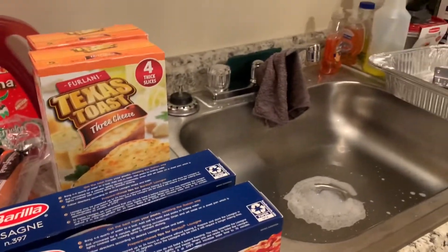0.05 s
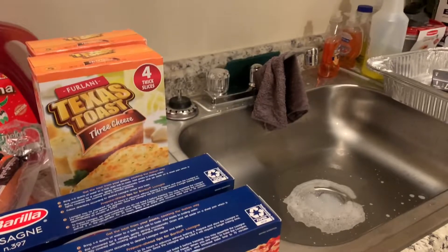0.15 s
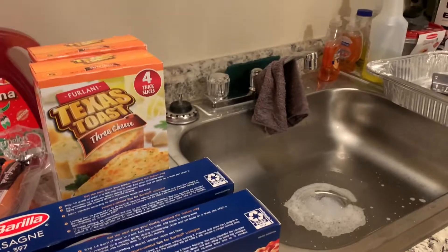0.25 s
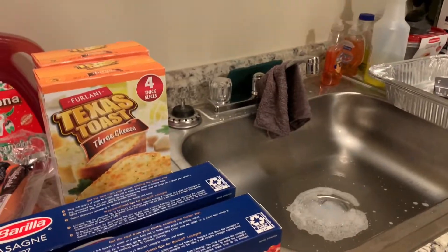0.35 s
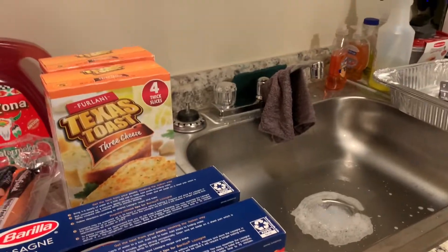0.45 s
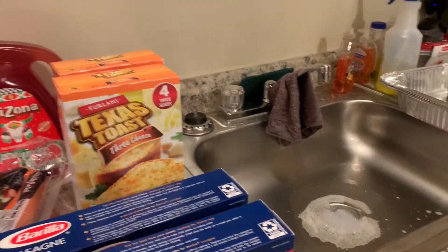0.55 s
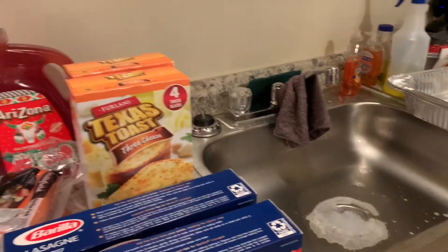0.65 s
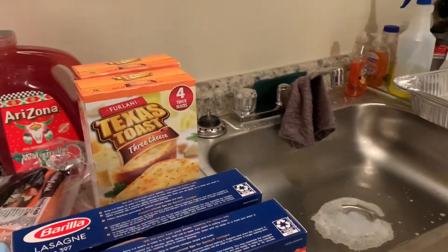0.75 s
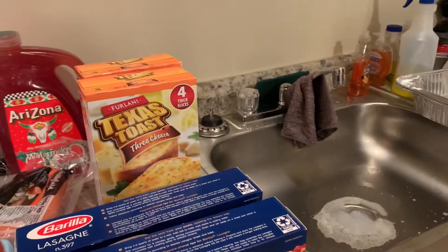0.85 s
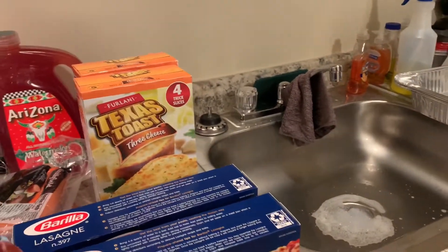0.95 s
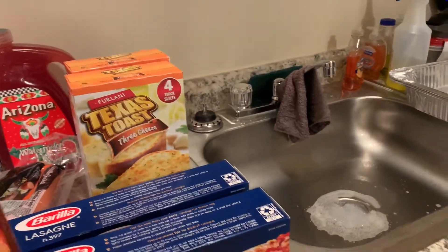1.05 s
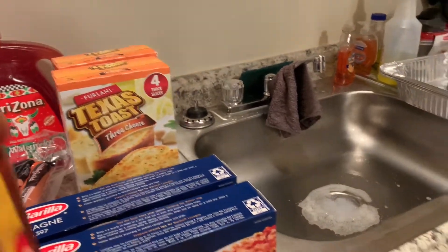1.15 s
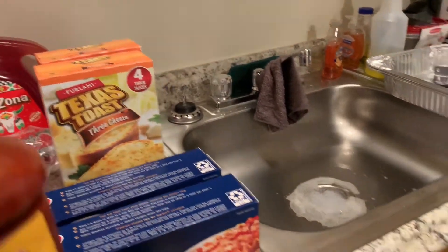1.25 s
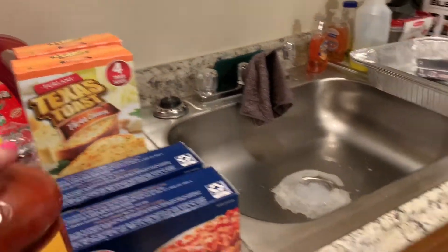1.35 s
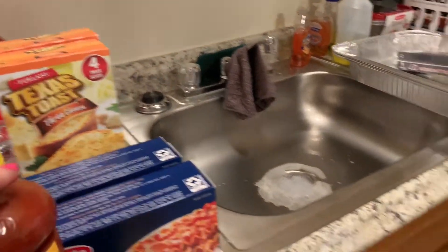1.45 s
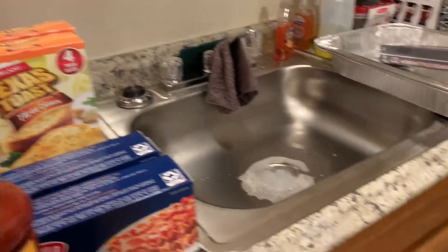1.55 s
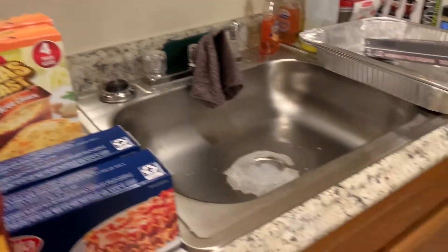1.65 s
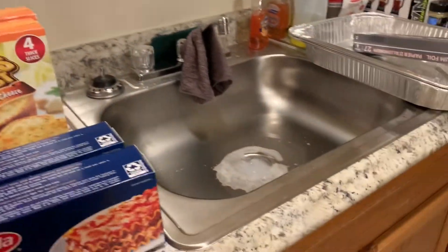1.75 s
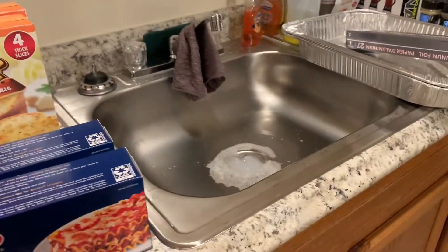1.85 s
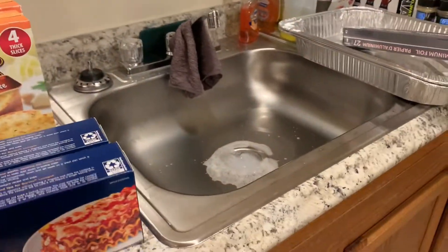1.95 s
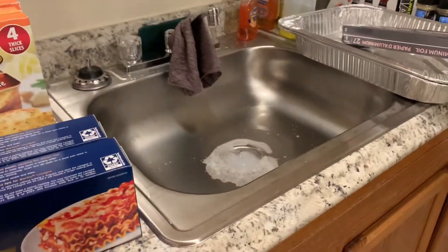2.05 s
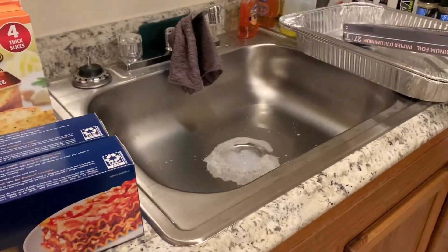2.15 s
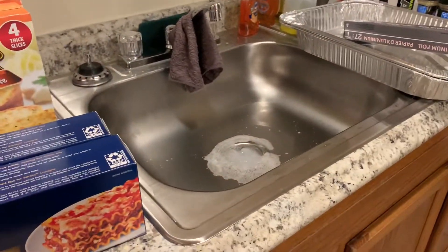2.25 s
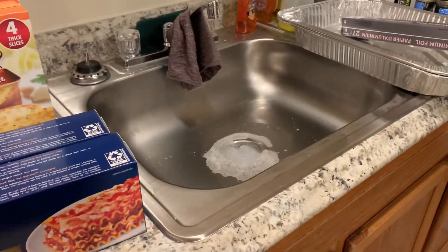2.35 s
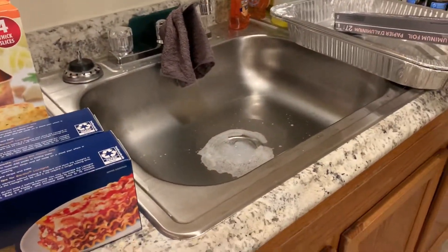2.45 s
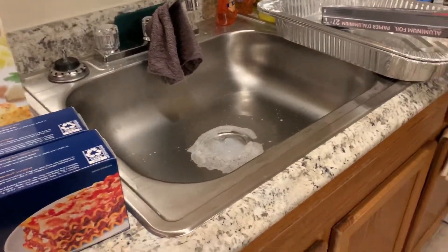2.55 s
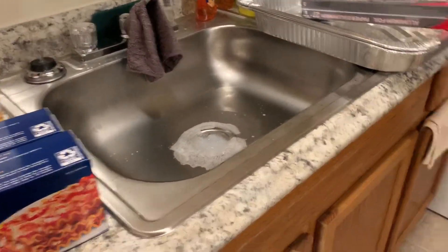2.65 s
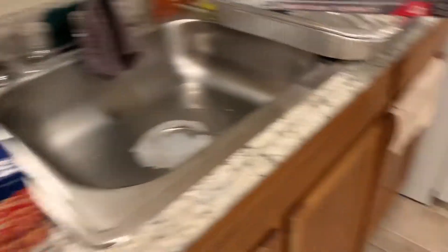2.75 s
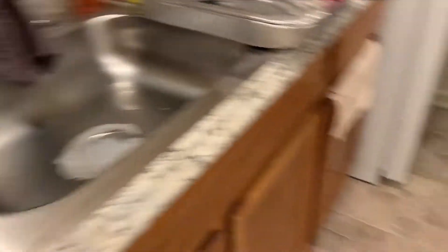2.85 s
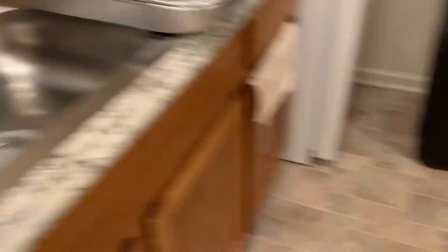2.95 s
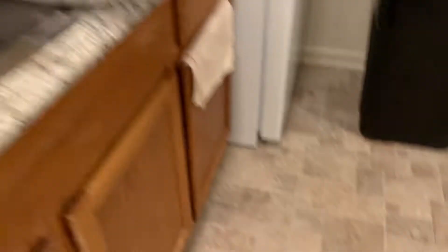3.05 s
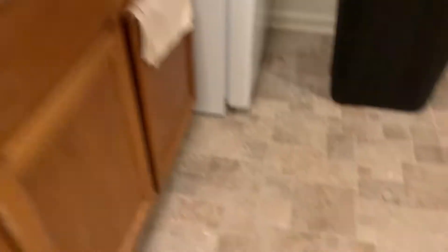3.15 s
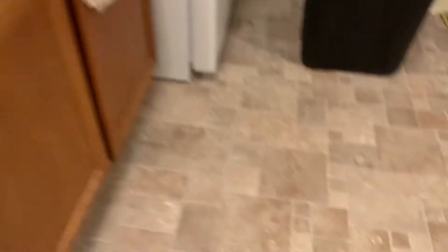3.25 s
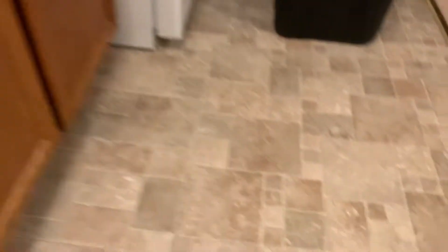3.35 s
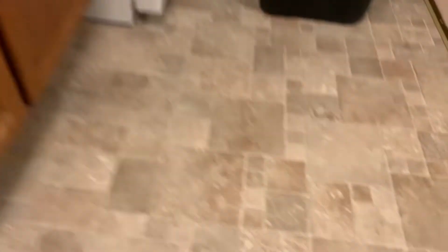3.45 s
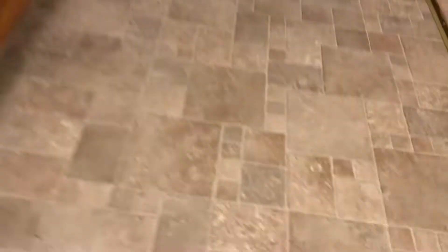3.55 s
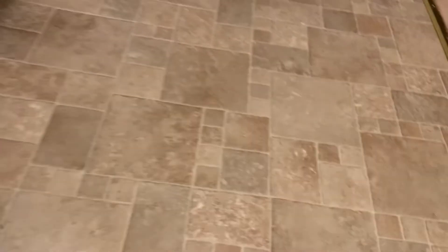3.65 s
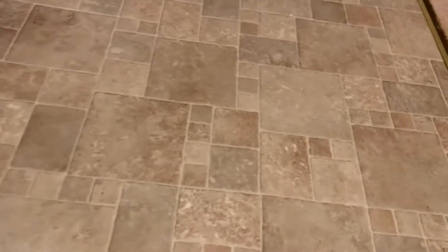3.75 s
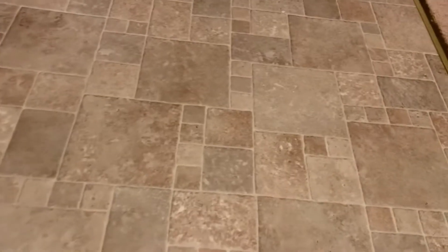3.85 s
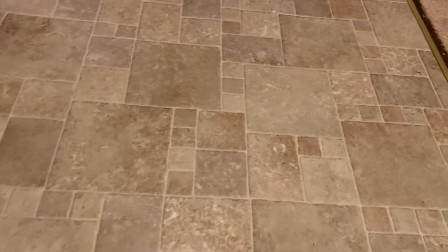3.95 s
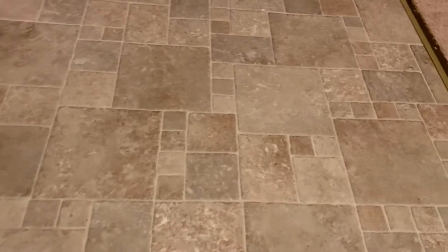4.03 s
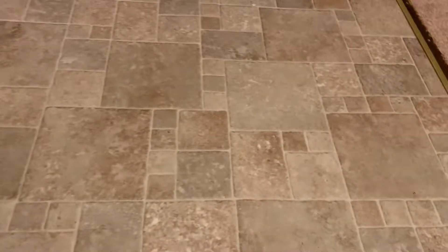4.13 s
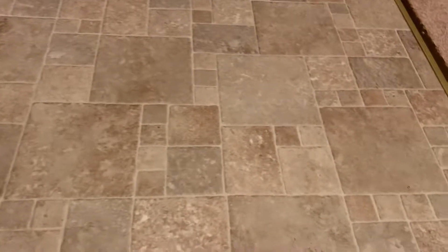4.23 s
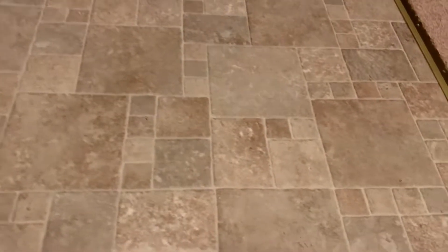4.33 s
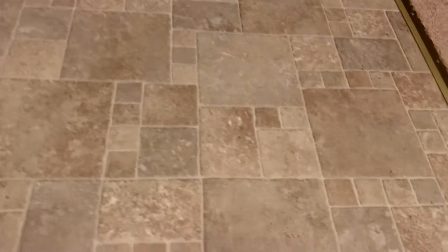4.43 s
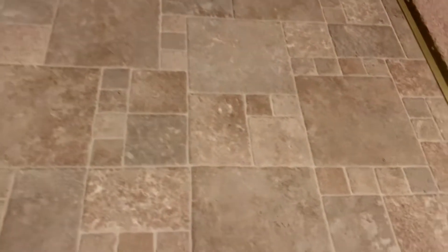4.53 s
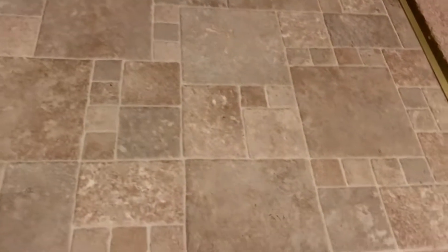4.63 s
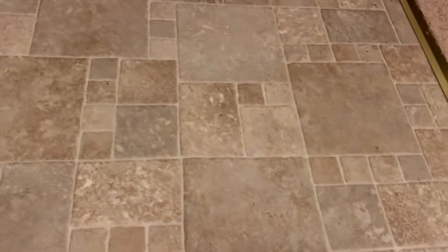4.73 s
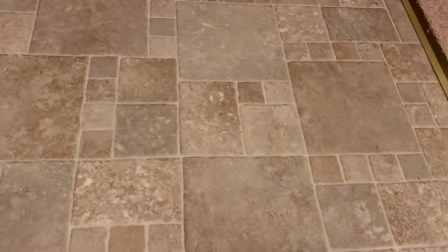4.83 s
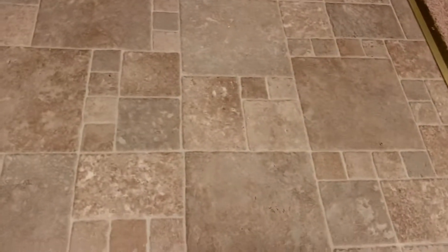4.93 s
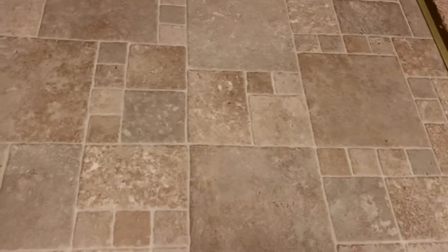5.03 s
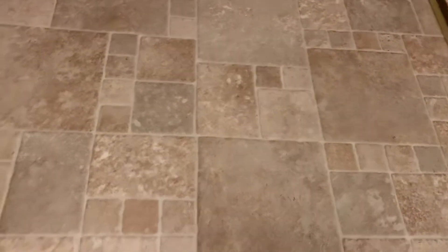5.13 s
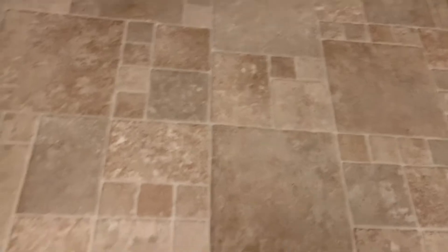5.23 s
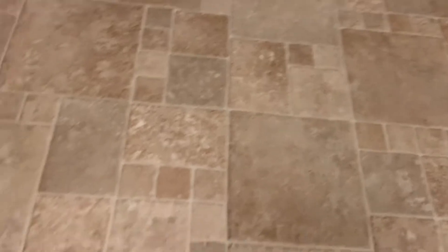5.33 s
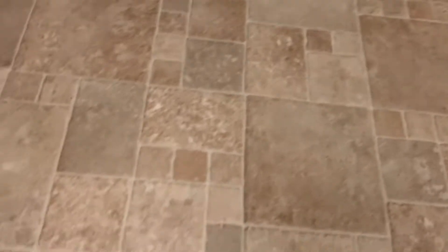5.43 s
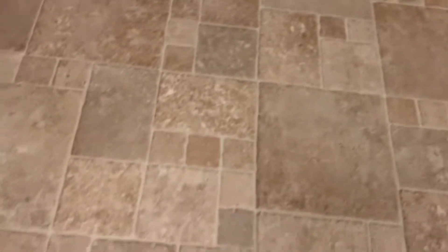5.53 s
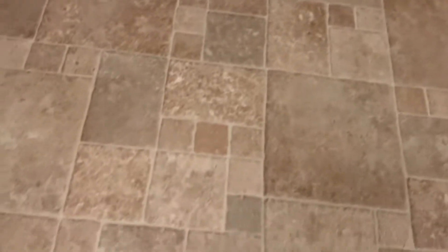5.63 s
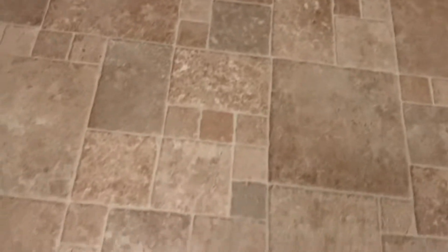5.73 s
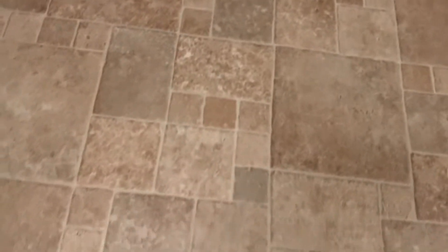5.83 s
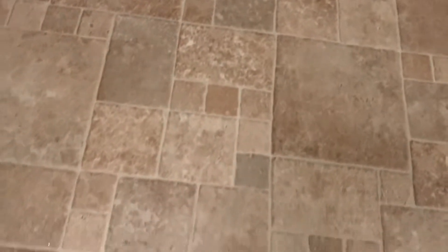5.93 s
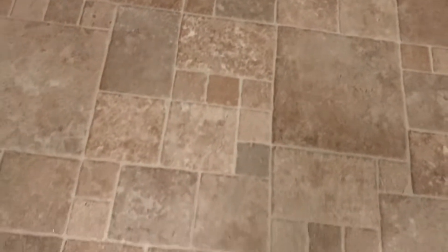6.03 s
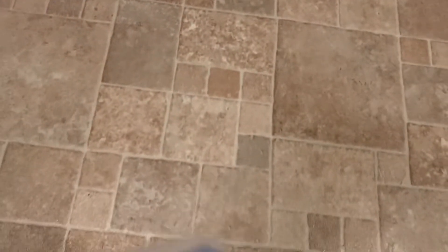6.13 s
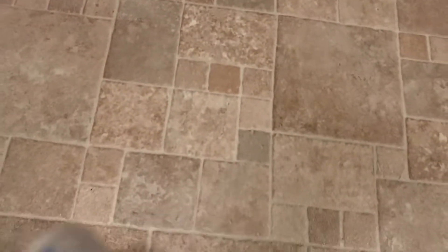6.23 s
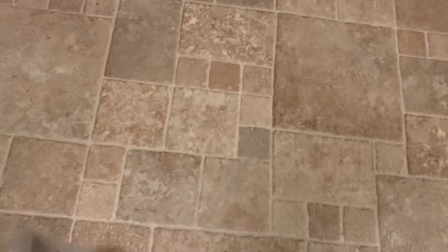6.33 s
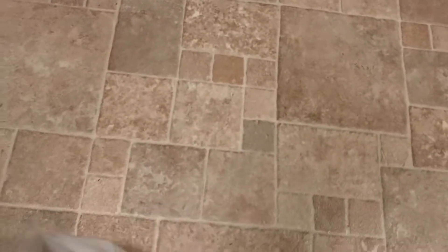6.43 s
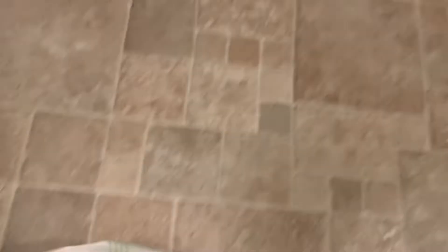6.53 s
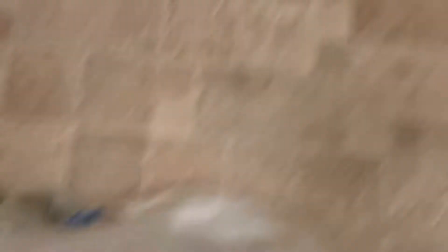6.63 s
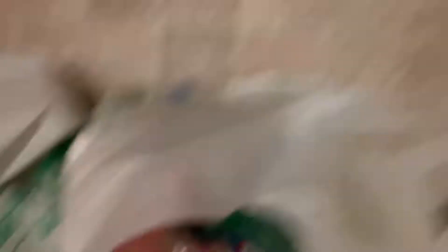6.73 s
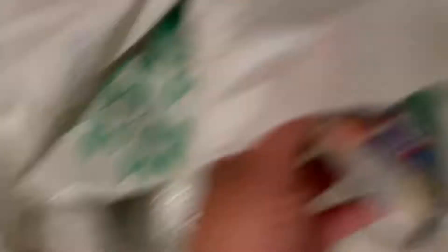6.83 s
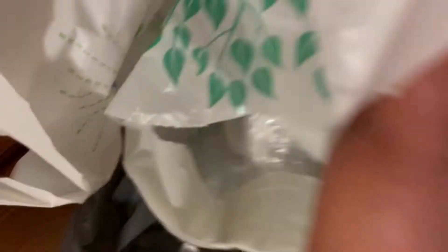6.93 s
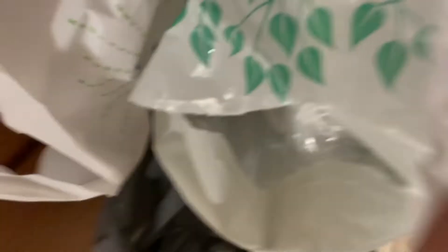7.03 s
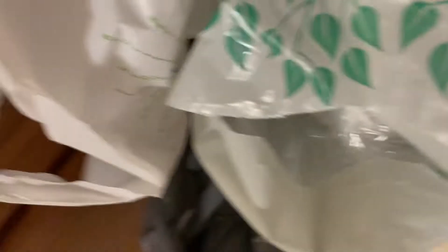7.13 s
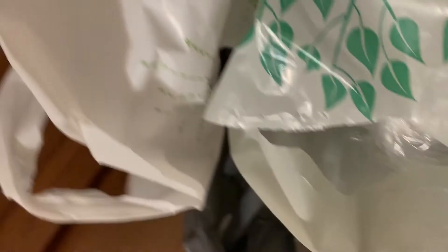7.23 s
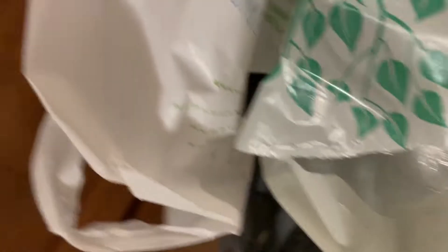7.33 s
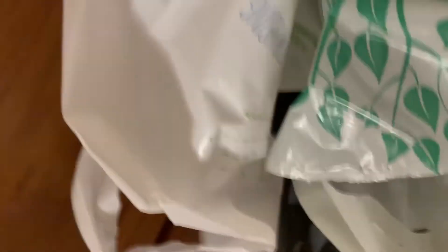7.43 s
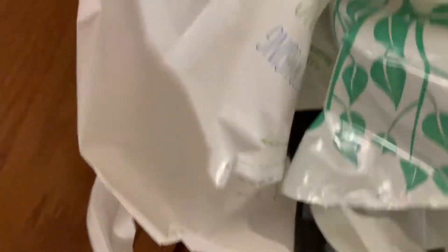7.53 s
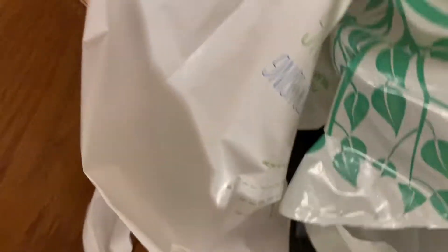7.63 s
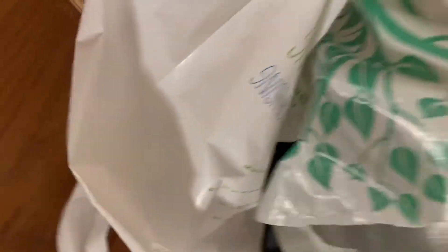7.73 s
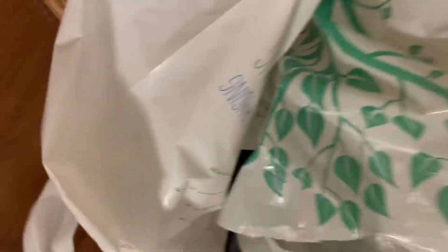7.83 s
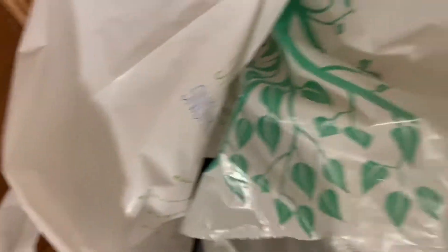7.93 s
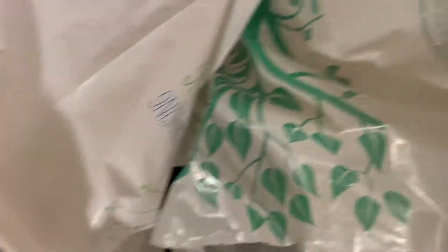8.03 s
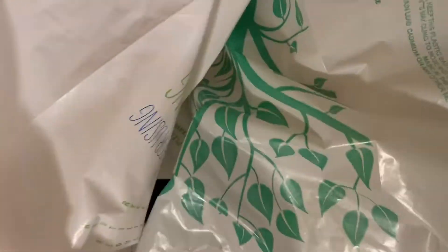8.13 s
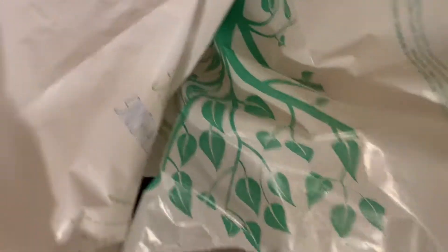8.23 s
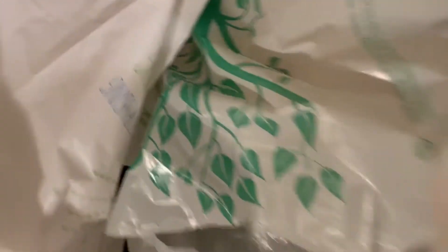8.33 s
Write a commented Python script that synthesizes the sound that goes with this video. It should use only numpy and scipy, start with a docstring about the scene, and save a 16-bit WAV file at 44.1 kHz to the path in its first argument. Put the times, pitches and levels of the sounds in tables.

```python
"""Rummaging in plastic bags

Hands rummage in thin grocery bags in a tiled kitchen, close to a hand-held microphone pair.
First a jar is set on the counter and something heavy thumps, both ringing in damped modes.
The film crackles in swarms of tiny buckles, with louder snaps where a crease flips over.
An appliance hums and its fan blows behind it all."""
import sys
import numpy as np
from scipy import signal
from scipy.fft import rfft, irfft, next_fast_len
from scipy.io import wavfile
from scipy.ndimage import uniform_filter1d

SR = 44100
rng = np.random.default_rng(int(sys.argv[2]) if len(sys.argv) > 2 else 0)


def put_to_file(sound):
    """Save the sound as 16-bit audio at rate SR, in the file named by the first command-line argument."""
    columns = np.atleast_2d(sound).T  # one column per channel
    safe = np.clip(columns, -1, 1)
    whole_steps = np.round(safe * 32767)
    wavfile.write(sys.argv[1], SR, whole_steps.astype(np.int16))


N = 369245

# Spectrum of small creases. Each row: frequency in Hz, relative density in dB.
CREASE_SPECTRUM = [(3000, -5.5), (5000, -4), (8000, 1), (14000, -3.5), (15500, -4.5)]


def amp(db):
    """Amplitude ratio: tenfold for every 20 dB."""
    return 10 ** (np.asarray(db) / 20)


def unit_rms(x):
    """Normalisation to unit mean power."""
    return x / np.sqrt(np.mean(x ** 2) + 1e-20)


def at_frequency(points, hz):
    """Interpolation on a logarithmic frequency axis."""
    f, value = np.transpose(points)
    return np.interp(np.log(hz + 1), np.log(f + 1), value)


def envelope(rows, column=1):
    """Gain at every sample by interpolation in dB, silent before the first row."""
    rows = np.array(rows)
    return amp(np.interp(np.arange(N) / SR, rows[:, 0], rows[:, column], left=-150))


def coloured(x, spectrum):
    """Minimum-phase filtering at unit energy; the spectrum falls away past its ends."""
    hz = abs(np.fft.fftfreq(8192, 1 / SR))
    (low_hz, low_db), (high_hz, high_db) = spectrum[0], spectrum[-1]
    extended = [(low_hz / 4, low_db - 40), *spectrum, (high_hz * 2, high_db - 30)]
    log_gain = np.log(amp(at_frequency(extended, hz)))
    taps = np.fft.ifft(np.exp(np.conj(signal.hilbert(log_gain)))).real[:4096]
    return signal.oaconvolve(x, taps[None] / np.linalg.norm(taps), axes=1)[:, :x.shape[1]]


def resonance(noise, hz, width_hz):
    """Forced response of one resonator, at rms 1."""
    return unit_rms(signal.lfilter(*signal.iirpeak(hz, hz / width_hz, SR), noise))


def wander(per_s):
    """Slow random fluctuation from smoothed noise, at rms 1."""
    span = int(SR / per_s)
    return unit_rms(uniform_filter1d(uniform_filter1d(rng.standard_normal(N), span), span))


def add(mix, s, sound):
    """Superposition of a sound starting at s seconds."""
    part = mix[:, round(s * SR):][:, :sound.shape[1]]
    part += sound[:, :part.shape[1]]


def random_colouring(x, depth_db, width_hz, life_s):
    """Spectral modulation: faint pitches come and go at random in the noise."""
    hz, t, spectra = signal.stft(x, SR, nperseg=1024, noverlap=896)
    field = rng.standard_normal((len(t), len(hz)))
    for _ in range(2):
        field = uniform_filter1d(field, int(life_s * SR / 128) + 1, axis=0)
        field = uniform_filter1d(field, int(width_hz / hz[1]) + 1, axis=1)
    spectra = spectra * amp(depth_db * unit_rms(field).T)
    return unit_rms(signal.istft(spectra, SR, nperseg=1024, noverlap=896)[1][:, :N])


def fan(air_noise, drive):
    """Broadband air noise with two noise-driven resonances."""
    # Fan air and self-noise. Each row: frequency in Hz, relative density in dB.
    air_spectrum = [(60, -6.5), (110, -1.5), (300, -4.5), (600, -15), (1400, -22), (2200, -30.5),
                    (3500, -41), (6000, -54), (15800, -45)]
    # The fan's resonant frequencies in Hz.
    centres_hz = [845, 1685]
    # One resonance per frequency. Each row: bandwidth in Hz, base level in dB.
    peaks = [(45, -67), (60, -70.5)]
    # They grow as the microphones turn to the fan. Each row: time in seconds, gain in dB.
    turning = [(.0, -3.5), (.9, -2), (3.3, 3.5)]
    level = amp(-54 + 1.2 * wander(per_s=4))
    air = level * random_colouring(coloured(air_noise, air_spectrum), depth_db=3.5, width_hz=45, life_s=0.1)
    for hz, (width_hz, db) in zip(centres_hz, peaks):
        air += amp(db) * envelope(turning) * resonance(drive, hz, width_hz)
    return air


def hum():
    """The appliance's tone wavers by slow frequency and amplitude modulation."""
    # Course of the hum. Each row: time in seconds, level in dB, frequency in Hz.
    course = [(0, -51.5, 109), (.3, -53, 110), (.47, -62, 107.6), (.7, -49, 106.9), (1.498, -67, 105.9),
              (2.6, -60, 111.3), (3.3, -49, 119.2), (8.37, -47.5, 120)]
    times, _, pitches = np.transpose(course)
    hz = np.interp(np.arange(N) / SR, times, pitches) + 0.8 * wander(per_s=11)
    cycles = np.cumsum(hz) / SR + np.array([[0], [0.35]])
    flutter_db = 1.3 * wander(per_s=34) + 1.1 * wander(per_s=9.3)
    return envelope(course) * amp(flutter_db) * np.sqrt(2) * np.sin(2 * np.pi * cycles)


def handling_rumble(noise):
    """Structure-borne noise of the microphones moving in the hand."""
    # Course of the rumble. Each row: time in seconds, level in dB.
    levels = [(0.0, -60), (0.7, -67), (0.8, -51), (0.98, -44), (1.47, -72), (1.68, -56), (2.05, -87),
              (2.19, -45), (2.49, -58.5), (5.64, -54.5), (6.01, -35.5), (6.11, -50), (6.45, -46.5),
              (7.25, -55.5), (7.32, -45), (8.0, -47), (8.11, -41), (8.37, -44)]
    # Its spectrum. Each row: frequency in Hz, relative density in dB.
    spectrum = [(20, -12), (40, -10.5), (55, -1), (90, -0.5), (200, -30)]
    return envelope(levels) * unit_rms(coloured(noise, spectrum))


def kitchen(x):
    """Reverberation: sparse reflections of random sign, each band decaying at its own rate."""
    # Decay of the tiled room. Each row: frequency in Hz, reverberation time in seconds.
    decay_times = [(100, 0.1), (500, 0.12), (2000, 0.077), (8000, 0.036)]
    taps = np.zeros((2, SR // 2))
    slots = np.arange(130, SR // 2 - 20, 20)
    arrivals = slots + rng.integers(0, 20, (2, len(slots)))
    np.put_along_axis(taps, arrivals, rng.choice([-1., 1.], arrivals.shape), 1)
    hz, t, spectra = signal.stft(taps, SR, nperseg=256)
    decay = amp(-60 * t / at_frequency(decay_times, hz)[:, None])
    tail = signal.istft(spectra * decay, SR, nperseg=256)[1]
    return signal.oaconvolve(x, tail / np.linalg.norm(tail[0]), axes=1)[:, :N]


def burst(rise_s, t60):
    """Envelope of a sudden release: quadratic growth, then exponential decay."""
    t = np.arange(1500) / SR
    return np.clip(t / rise_s, 0, 1) ** 2 * amp(-60 * np.maximum(t - rise_s, 0) / t60)


def transient(peak_db, spectrum, rise_s, t60, crack):
    """Impulsive excitation: one hard crack inside a short ragged run of smaller ones."""
    run = rng.standard_normal((2, 1500)) * amp(5.4 * rng.standard_normal(1500)) * burst(rise_s, t60)
    impulse = crack * (np.arange(1500) == round(rise_s * SR))
    sound = coloured(run + impulse, spectrum)
    return amp(peak_db) * sound / abs(sound).max(1, keepdims=True)


def ring(modes):
    """Free vibration of damped modes with a soft onset, a quarter cycle apart in the two channels."""
    t = np.arange(SR // 2) / SR
    out = np.zeros((2, len(t)))
    for hz, db, t60 in modes:
        cycles = hz * t + 0.11 * rng.random() + np.array([[0], [0.25]])
        onset = 1 - np.exp(-t * hz / 0.87)
        out += onset * amp(db - 60 * t / t60) * np.sin(2 * np.pi * cycles)
    return out / 2


def knocks():
    """Impacts excite modes: the jar rocks down, its lid clinks, then something heavy thumps."""
    # The jar's blows on the counter. Each row: start in seconds, gain in dB.
    blows = [(1.639, -31.5), (1.646, -25.5), (1.652, -26), (1.717, -39.5), (1.766, -43), (1.92, -40.5)]
    # Contact noise of a blow. Each row: frequency in Hz, relative density in dB.
    contact = [(200, -32), (400, 19), (1000, 8), (2000, -19), (4000, -20), (12000, -64)]
    # Three sets of modes. Each row: frequency in Hz, relative level in dB, 60 dB decay time in seconds.
    jar_and_counter = [(103, 1, .8), (320, 14, 0.05), (382, 3, 0.33), (447, 3, 0.3), (600, 8, 0.05),
                       (1000, 6, 0.04)]
    lid = [(2530, 7, 0.017), (2950, 9.5, 0.012)]
    cabinet_and_floor = [(50, -7, 0.6), (107, 1, 0.12), (151, -16, 0.35), (330, -2, 0.06),
                         (1200, -9, 0.015)]
    out = np.zeros((2, N))
    for s, db in blows:
        add(out, s, amp(db) * ring(jar_and_counter))
        add(out, s, transient(db + 10, contact, rise_s=0.00212, t60=0.025, crack=5.6))
    add(out, 1.9835, amp(-26) * ring(lid))
    add(out, 2.161, amp(-11) * ring(cabinet_and_floor))
    return out


def swishes():
    """Friction noise: a sleeve, then taut film, rubs in soft swells of resonant hiss."""
    # Each row: start in seconds, length in seconds, level in dB, centre in Hz, quality factor.
    strokes = [(0.603, 0.53, -78, 3130, 2.6), (2.327, 0.18, -67, 3130, 3), (2.564, 0.14, -61.5, 4300, 1.7),
               (3.076, .17, -61, 3120, 2.3), (5.26, 0.31, -36.5, 1780, 7.5)]
    out = np.zeros((2, N))
    for s, length_s, db, hz, q in strokes:
        noise = rng.standard_normal((2, SR // 2))[:, :int(length_s * SR)]
        hiss = resonance(resonance(noise, hz, hz / q), hz, hz / q)
        add(out, s, amp(db) * np.hanning(hiss.shape[1]) * hiss)
    return out


def swarm(spectrum, per_s, spread_db, rise_s, t60, q, hiss_share, crack_share):
    """Shot noise of buckles over a sliding hiss: some ring at one pitch, some crack across the band."""
    size_db = spread_db * np.minimum(rng.exponential(1, N), 2.5) + 2.6 * wander(per_s=17)
    buckles = amp(size_db) * (rng.random(N) < per_s / SR)
    kind = rng.integers(0, 8, N)

    def excitation(chosen):
        """Noise carrying the summed power of the chosen buckles."""
        power = signal.oaconvolve(buckles ** 2 * chosen, burst(rise_s, t60) ** 2)[:N]
        return np.sqrt(abs(power)) * rng.standard_normal((2, N))

    # Small patches of film ring high, large ones low.
    pitches = np.geomspace(spectrum[1][0], spectrum[-2][0], 6)
    ringing = np.zeros((2, N))
    for k, hz in enumerate(pitches):
        gain = amp(at_frequency(spectrum, hz)) * np.sqrt(hz)
        ringing += gain * resonance(excitation(kind == k), hz, hz / q)
    cracks = unit_rms(coloured(excitation(kind >= len(pitches)), spectrum))
    hiss = unit_rms(coloured(rng.standard_normal((2, N)), spectrum))
    crackle = np.sqrt(1 - crack_share) * unit_rms(ringing) + np.sqrt(crack_share) * cracks
    return np.sqrt(1 - hiss_share) * crackle + np.sqrt(hiss_share) * hiss


def rummaging(layer):
    """Gain of one film layer: steady rustle and squeezes are incoherent, so their powers add."""
    # Rustle of the jar's wrapper, then of the bags.
    # Each row: time in seconds, then levels in dB of creases, folds and swing (layers 0, 1, 2).
    rustle = [(1.631, -71, -81, -53), (1.641, -48, -33.5, -34), (1.747, -64, -48, -43.5),
              (1.998, -53, -53, -43.5), (2.116, -70, -59, -49.5), (2.33, -89, -70, -50),
              (3.007, -77, -69, -67.5), (3.36, -66, -63, -58), (3.8, -55, -51.5, -66),
              (4.06, -41.5, -47, -56.5), (4.53, -46.5, -43.5, -54), (4.95, -43, -41, -52.5),
              (5.4, -40, -38, -46.5), (5.9, -32.5, -31.5, -42), (6.36, -31.5, -31, -42.5),
              (6.97, -41.5, -45, -52.5), (7.3, -34, -40.5, -44), (7.93, -35.5, -39.5, -47.5),
              (8.2, -42, -34, -56), (8.3, -60, -51.5, -58), (8.372, -49, -50, -63)]
    # The hand closes on the film. Each row: start and hold in seconds, then the same three levels.
    squeezes = [(2.146, 0.016, -60, -52, -35.5), (2.476, 0.0091, -63, -57, -61),
                (2.67, 0.0038, -54, -48.5, -56.5), (3.361, 0.072, -38, -46, -54),
                (3.458, 0.27, -37.5, -40.5, -52.5), (3.835, 0.011, -49, -64, -60),
                (3.928, 0.062, -48, -46.5, -71), (4.126, 0.11, -37, -39, -47),
                (4.266, 0.041, -35, -37.5, -50), (4.402, 0.028, -43, -33.5, -41.5),
                (4.548, 0.14, -32, -33.5, -43.5), (4.726, 0.15, -33.5, -31, -48.5),
                (4.993, 0.01, -37, -30.5, -53), (5.086, 0.1, -38.5, -34, -49),
                (5.435, 0.13, -30.5, -30.5, -42.5), (5.757, 0.13, -27, -31, -48),
                (5.937, 0.017, -26, -23.5, -36.5), (6.064, 0.17, -29.5, -38.5, -38.5),
                (6.389, 0.1, -31.5, -30, -37), (6.63, 0.046, -34.5, -35, -44.5),
                (6.835, 0.0036, -34.5, -36, -42), (6.988, 0.0052, -26.5, -41, -62),
                (7.05, 0.0073, -32, -38, -43.5), (7.125, 0.075, -29.5, -42, -63),
                (7.278, 0.076, -28, -39, -39), (7.359, 0.0048, -20, -23.5, -28.5),
                (7.449, 0.011, -22.5, -35, -37.5), (7.543, 0.043, -31, -38, -34),
                (7.654, 0.18, -28, -34, -40), (8.007, 0.0061, -28, -55, -40), (8.078, 0.053, -26, -29, -33),
                (8.323, 0.0065, -64, -41.5, -47)]
    close_s, relax_db_per_s = 0.016, 252
    t = np.arange(SR // 2) / SR
    power = envelope(rustle, column=layer + 1)[None] ** 2
    for s, hold_s, *levels_db in squeezes:
        closing = np.minimum(t / close_s, 1)
        relaxing = amp(-relax_db_per_s * np.maximum(t - close_s - hold_s, 0))
        add(power, s, (amp(levels_db[layer]) * closing * relaxing)[None] ** 2)
    return np.sqrt(power[0])


def crumple():
    """Buckling of thin film: small creases tick high, wide folds pop lower, the swinging bag puffs."""
    # Spectra of the folds and of the swing. Each row: frequency in Hz, relative density in dB.
    fold_spectrum = [(300, -14.5), (700, -3), (1200, 1), (2500, 0), (4000, -0.5), (7000, -11)]
    swing_spectrum = [(60, 1), (170, 3), (300, -0.5), (600, -7), (1200, -24)]
    creases = swarm(CREASE_SPECTRUM, per_s=1100, spread_db=3.5, rise_s=0.0026, t60=0.005,
                    q=0.96, hiss_share=0.21, crack_share=0.35)
    folds = swarm(fold_spectrum, per_s=500, spread_db=5.5, rise_s=0.0034, t60=0.012,
                  q=2.7, hiss_share=0.38, crack_share=0.28)
    swing = swarm(swing_spectrum, per_s=120, spread_db=3.5, rise_s=0.0052, t60=0.077,
                  q=1.85, hiss_share=0.59, crack_share=0.27)
    folds = random_colouring(folds, depth_db=2.6, width_hz=200, life_s=0.04)
    swing = random_colouring(swing, depth_db=3, width_hz=60, life_s=0.059)
    return rummaging(0) * creases + rummaging(1) * folds + rummaging(2) * swing


def snaps():
    """Snap-through: single creases and folds flip over, giving the loudest ticks and pops."""
    # Small creases. Each row: start in seconds, peak level in dB.
    ticks = [(1.7636, -30), (1.827, -32), (2.021, -31), (2.161, -39), (2.189, -50), (2.69, -29),
             (3.429, -23), (3.5912, -13), (3.672, -17), (3.854, -23), (4.0816, -16), (4.231, -12),
             (4.457, -16), (4.738, -13), (4.752, -8), (5.009, -16), (5.1605, -0.5), (5.37, -16.5),
             (5.3851, -14.5), (5.434, -12), (5.726, -10), (5.7424, -5.5), (5.825, -4.5), (5.867, -7),
             (5.966, -2.5), (6.03, -7.5), (6.106, -22), (6.277, -14), (6.344, -11), (6.391, -6.5),
             (6.648, -11.5), (6.7366, -11.5), (6.849, -14), (6.8535, -12.5), (6.894, -19), (6.913, -19),
             (6.9574, -15), (7.026, -10), (7.056, -7), (7.0682, -6), (7.231, -4.5), (7.266, -8.5),
             (7.3017, -6.5), (7.3928, 1), (7.4615, -1), (7.599, -18), (7.675, -4), (7.787, -6.5),
             (7.8673, -5), (7.942, -8.5), (7.984, -8.5), (8.024, -13), (8.146, -13), (8.317, -30),
             (8.346, -18)]
    # Wide folds. Each row: start in seconds, peak level in dB, pitch in Hz.
    pops = [(3.671, -16, 4030), (4.43, -25, 3800), (4.456, -15.5, 3950), (4.686, -14.5, 2750),
            (4.6976, -17, 1010), (4.752, -17, 3900), (4.778, -22, 1010), (4.855, -16, 1094),
            (4.8786, -11.5, 1346), (4.885, -15.5, 1000), (5.0276, -14.5, 1760), (5.11, -12.5, 1190),
            (5.1137, -11.5, 3220), (5.15, -10.5, 1010), (5.1596, -6, 2570), (5.386, -14.5, 2500),
            (5.53, -14, 1190), (5.555, -13, 1284), (5.779, -23, 2040), (5.8676, -17, 2140),
            (5.9648, -8.5, 840), (6.0295, -12.5, 1510), (6.0375, -13, 1750), (6.2198, -11, 990),
            (6.2788, -10, 3340), (6.676, -19.5, 1610), (6.7157, -21.5, 1320), (6.956, -23, 3300),
            (7.026, -16, 4360), (7.085, -12.5, 1990), (7.139, -22.5, 2000), (7.2352, -8, 1455),
            (7.2943, -10.5, 2570), (7.307, -14.5, 1710), (7.336, -17.5, 1520), (7.3723, -10.5, 1710),
            (7.468, -15, 1890), (7.578, -11.5, 1850), (7.941, -23.5, 885), (8.029, -12, 1760),
            (8.03, -12.5, 1110), (8.125, -18, 602), (8.2027, -20, 3700), (8.316, -23.5, 3405),
            (8.346, -8, 1990)]
    out = np.zeros((2, N))
    for s, db in ticks:
        add(out, s, transient(db, [(1500, -15)] + CREASE_SPECTRUM, rise_s=0.002, t60=0.0065, crack=4))
    for s, db, hz in pops:
        spectrum = [(hz / 3, -12), (hz / 1.48, -8), (hz, 0), (hz * 1.46, -8), (hz * 3, -10)]
        add(out, s, transient(db, spectrum, rise_s=0.0028, t60=0.012, crack=3.3))
    return out


def scene():
    """Superposition of the bags, the knocks, their reverberation and the background."""
    bags = crumple() + snaps() + swishes()
    hits = knocks()
    reverberation = kitchen(amp(-12) * bags + amp(-12.5) * hits)
    air_noise, drive = rng.standard_normal((2, 2, N))
    background = fan(air_noise, drive) + hum() + handling_rumble(drive)
    return background + reverberation + hits + bags


def record(dry):
    """Partial coherence between two microphones, then soft saturation and a band limit."""
    # The microphone pair. Each row: frequency in Hz, coherence from 0 to 1,
    # phase lead of the right channel in cycles, gain of the left in dB.
    ports = [(0, 0.97, 0.25, -1), (143, 0.87, -0.02, -2.5), (416, 0.53, 0.11, 1), (910, 0.39, -0.11, 0.4),
             (1380, 0.98, -0.22, -1), (2570, 0.43, -0.35, -1), (4100, 0.09, -0.79, -2),
             (5970, 0.26, -1.9, -4.5), (8215, 1, -1.562, 0), (18770, 1, 0.61, -0.5)]
    ceiling, cutoff_hz = 1.2, 15900
    size = next_fast_len(N + 4096)
    hz = np.fft.rfftfreq(size, 1 / SR)
    port_hz, *columns = np.transpose(ports)
    coherence, lead, left_db = (np.interp(hz, port_hz, c) for c in columns)
    lead *= np.minimum(hz / 250, 1)  # the longest waves reach both microphones in step
    left, other = rfft(dry, size)
    right = coherence * np.exp(2j * np.pi * lead) * left + np.sqrt(1 - coherence ** 2) * other
    pair = irfft(np.array([left * amp(left_db), right]), size)[:, :N]
    pair = ceiling * np.tanh(pair / ceiling)
    low_pass = signal.firwin(255, cutoff_hz, window=("kaiser", 9), fs=SR)
    return signal.oaconvolve(pair, low_pass[None], "same")


dry = scene()
out = record(dry)
put_to_file(out)
```